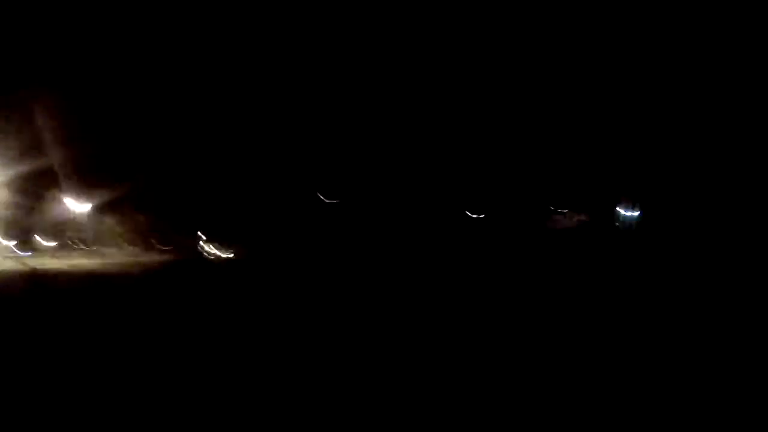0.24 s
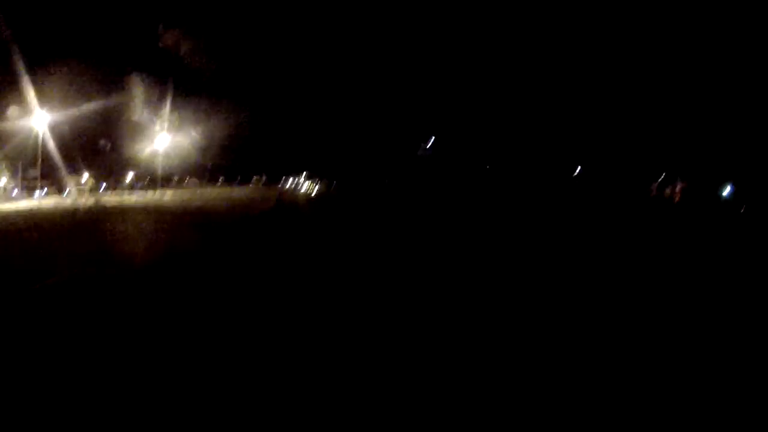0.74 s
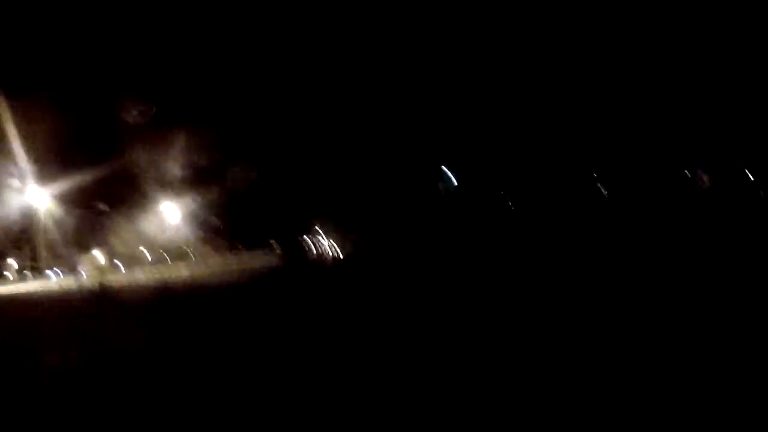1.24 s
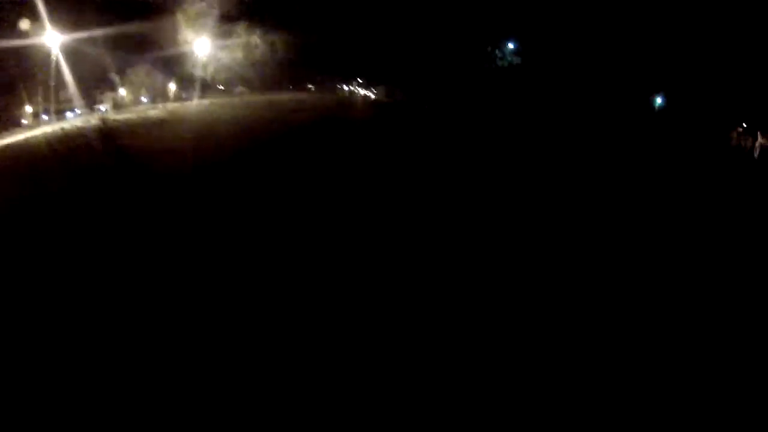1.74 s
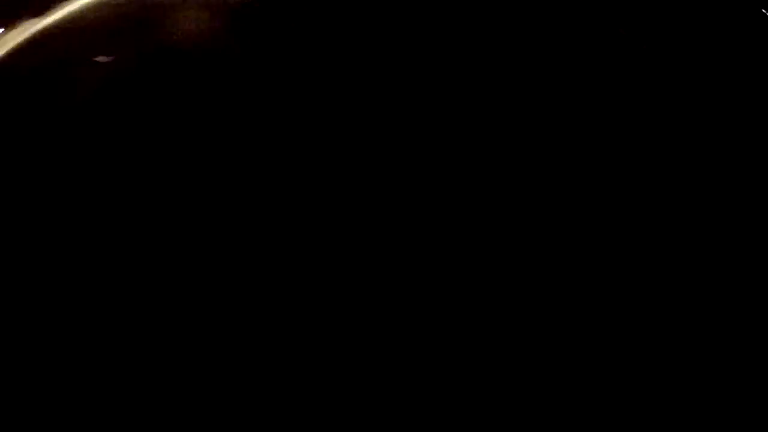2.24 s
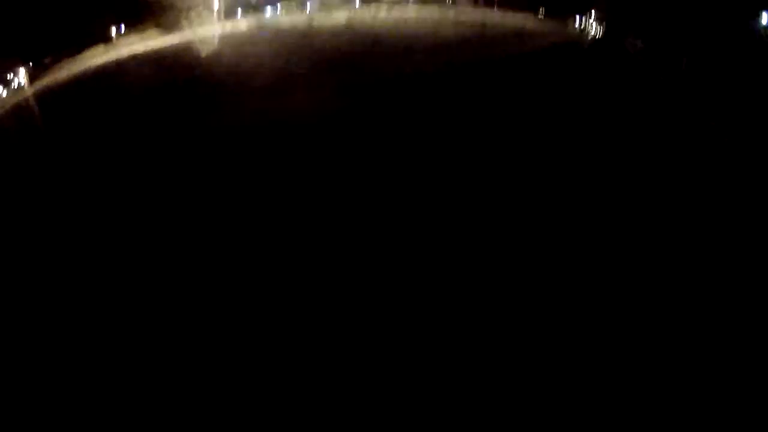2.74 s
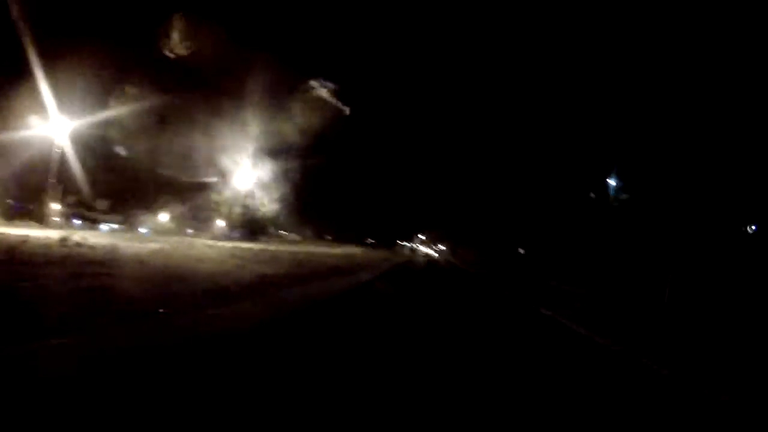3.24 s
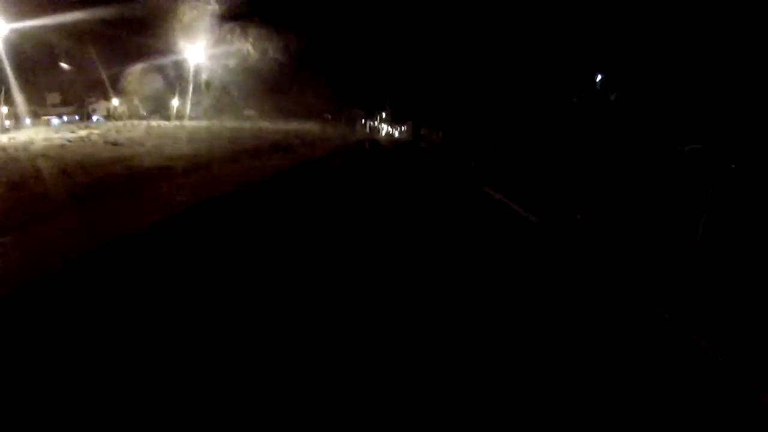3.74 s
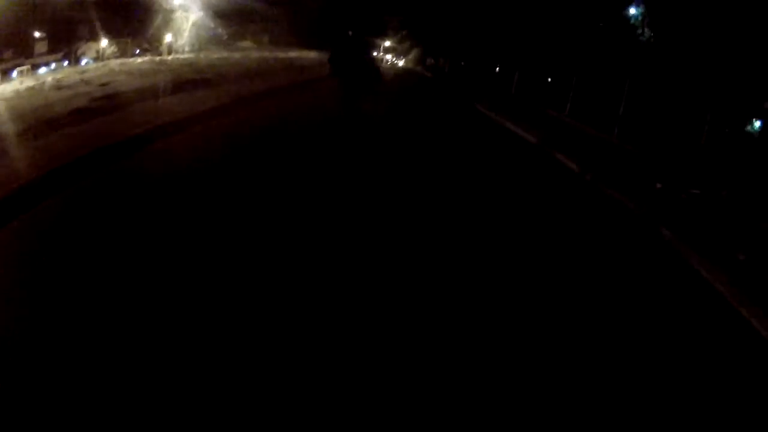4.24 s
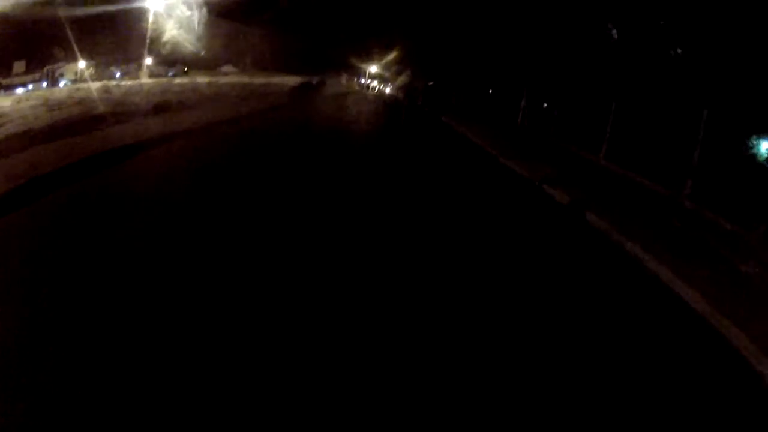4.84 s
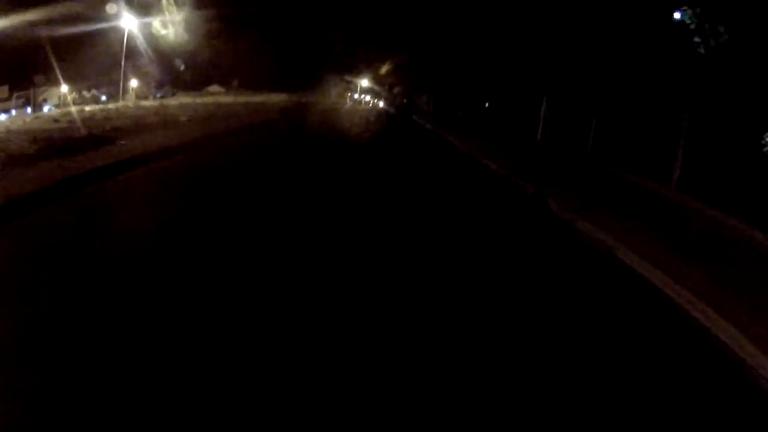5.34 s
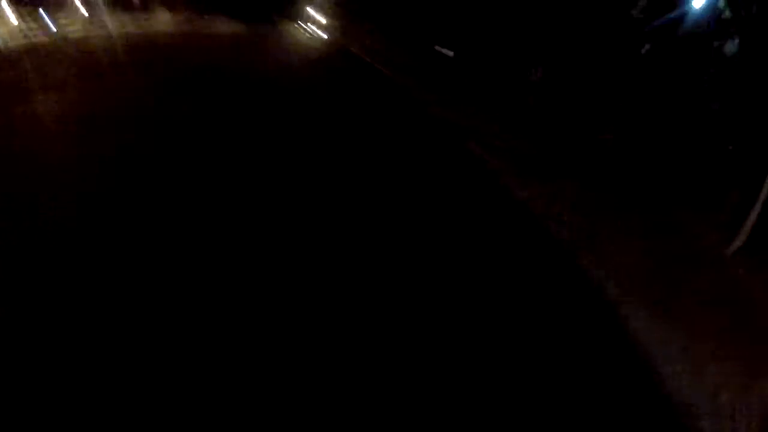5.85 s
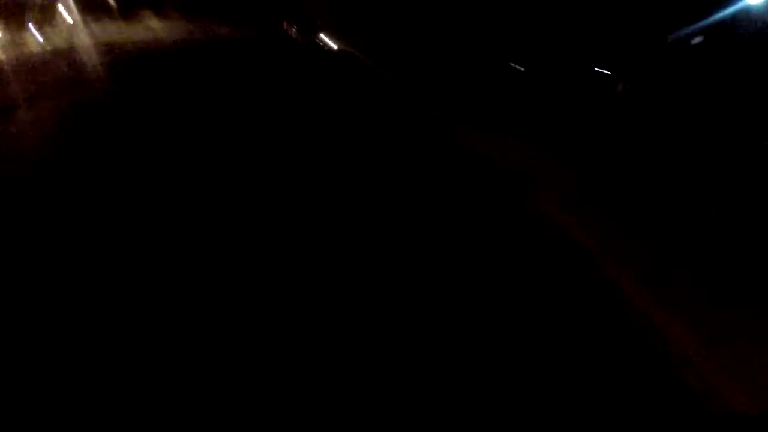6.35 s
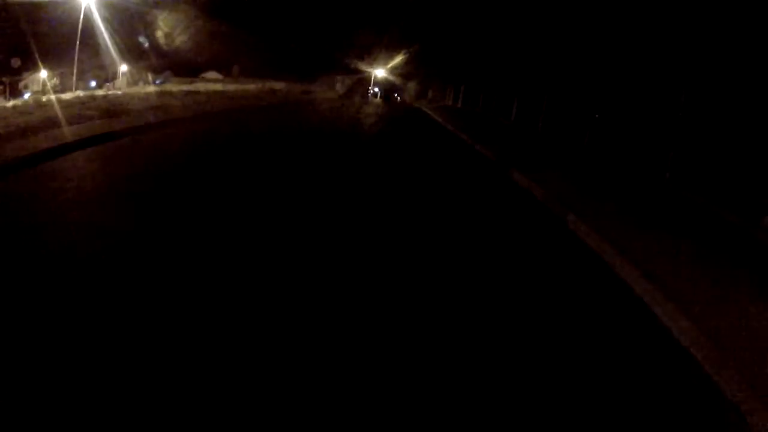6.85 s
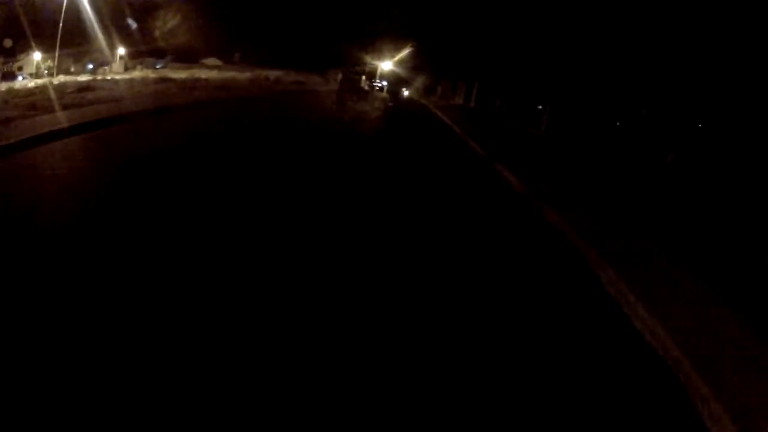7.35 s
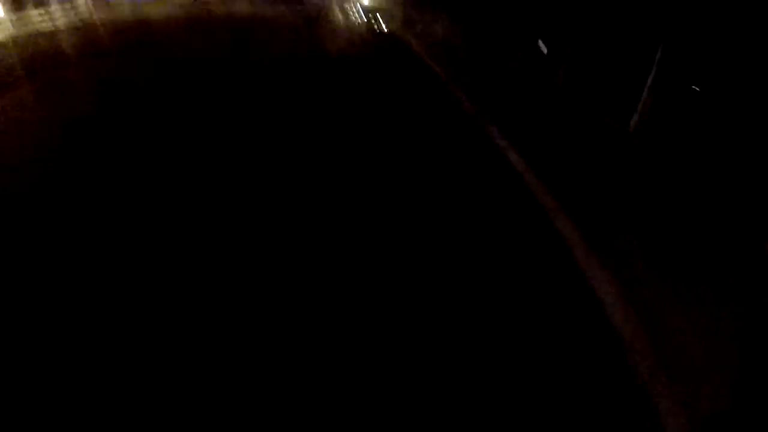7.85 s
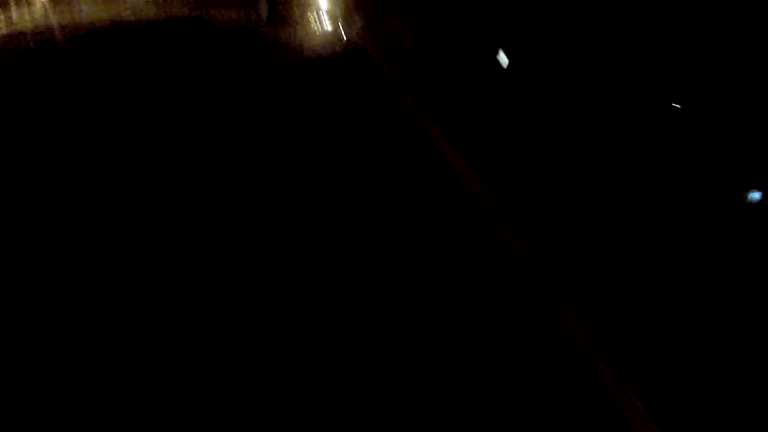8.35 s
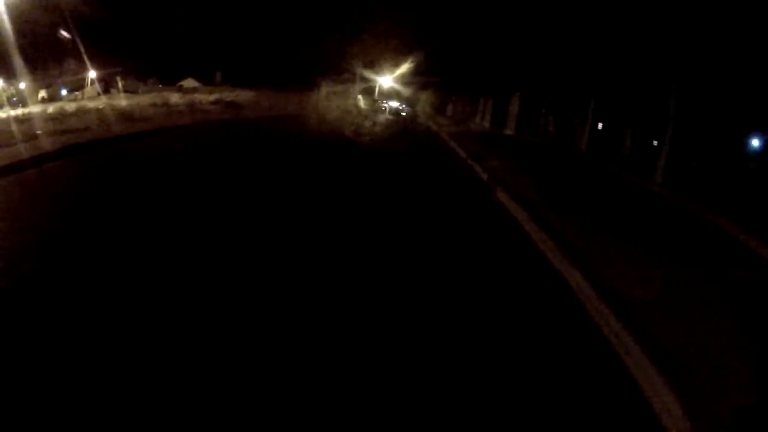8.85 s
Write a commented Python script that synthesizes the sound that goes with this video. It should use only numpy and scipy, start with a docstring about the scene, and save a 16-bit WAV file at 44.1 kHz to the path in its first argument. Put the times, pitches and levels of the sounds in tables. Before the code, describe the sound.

Close, boomy mono sound from a handheld camera outdoors: deep distorted knocks, plastic taps and skin rubs come first over quiet rolling wheels. After a brief low drone and a second bout of handling around three seconds, the longboard's grainy hum on asphalt takes over, swelling past the middle, with wind rumble, sparse dry ticks, sizzling wheels and two final finger taps.

```python
"""A longboard rolls down an asphalt street at night, heard from a small camera in the rider's hand.
From start to end the rough road drums a hum out of wheels and deck, and wind rumbles on the microphone.
For two seconds restless fingers tap, rub and knock the camera, with thumps so deep that they overload it.
A soft low drone swells up, then comes a second flurry with a short rub; small dry ticks are scattered about.
Later the hum grows, a fine wheel sizzle comes closer twice, and two last taps sound near the end."""
import sys
import numpy as np
from scipy import signal
from scipy.fft import rfft, irfft, next_fast_len
from scipy.io import wavfile

SR = 44100
rng = np.random.default_rng(int(sys.argv[2]) if len(sys.argv) > 2 else 0)


def generate_wav(sig):
    """Save sig (samples, or channels by samples) to the path in sys.argv[1] as 16-bit PCM at SR."""
    pcm = np.round(np.clip(np.atleast_2d(sig).T, -1, 1) * 32767).astype(np.int16)
    wavfile.write(sys.argv[1], SR, pcm)


N = 400869
TIME = np.arange(N) / SR

# spells when the fingers are restless: from/s, to/s
FIDGETS = [(0.05, 2.05), (2.95, 3.25)]
# jolts of the camera, levels relative: t/s, knock level/dB, hardness/dB, thud pitch f/Hz,
# rocking level/dB, rocking pitch f/Hz, time for the rocking to fall 60 dB/s
JOLTS = [(0.005, -4.5, 2, 330, -11, 65, .16), (0.099, -16.5, -10, 200, -18, 56, .13),
         (0.2752, 6, -6, 274, -1.5, 69.5, .089), (0.334, -4, -14, 215, 2, 89.6, .047),
         (0.388, -16, -3, 230, -11.5, 56, .083), (0.421, -13.5, -3, 221, -7.5, 88, .13),
         (0.615, -12, -14, 230, -17.5, 52.3, .21), (0.904, -26, -3, 200, -10.5, 65, .11),
         (1.0234, 2.5, -5, 299, -3.5, 64.6, .11), (1.073, -14.5, 6, 250, -1.5, 88, .087),
         (1.1224, 5.5, -1.5, 282, -5, 61, .11), (1.156, -16, 11, 300, -15, 82, .17),
         (1.3338, -2.5, -11, 222, -6.5, 48, .13), (1.612, -23, 1, 250, -14.5, 68, .13),
         (1.739, -9, -11, 230, -14, 78, .1), (1.812, -23, -5, 230, -14, 64, .18),
         (1.9009, 0.5, -7.5, 292, -2, 66.4, .13), (1.9725, -2, -1.5, 250, 0.5, 81.7, .081),
         (3.017, 2.5, 4, 350, -14, 60, .19), (3.133, -16, -8, 220, -19, 56.5, .15),
         (3.217, -20.5, -16, 230, -36, 60, .1), (3.364, -28, -10, 220, -21, 53.8, .17),
         (3.466, -20.5, -1, 200, -20.5, 101, .069), (3.728, -25, 0, 237, -16, 55.4, .19),
         (8.02, -32, 0, 200, -35, 89, .11)]


def from_db(db):
    """Turn decibels into a gain."""
    return 10 ** (np.asarray(db) / 20)


def rms_one(x):
    """Scale a sound to an average (rms) strength of 1."""
    return x / np.sqrt(np.mean(x ** 2) + 1e-20)


def in_time(rows):
    """Draw straight lines between the points of each column, one value per sample."""
    s, *columns = np.transpose(rows)
    return [np.interp(TIME, s, column) for column in columns]


def drift(rate):
    """Wander at random with a spread of 1, taking `rate` new values per second."""
    knots = rng.standard_normal(2000)
    return rms_one(np.interp(TIME * rate, np.arange(len(knots)), knots))


def swell(start_s, length_s, attack_s, release_s):
    """Gain that rises, may hold at 1, and falls."""
    rise = (TIME - start_s) / attack_s
    fall = (start_s + length_s - TIME) / release_s
    return np.clip(np.minimum(rise, fall), 0, 1)


def coloured(x, spectrum):
    """Give a steady sound a balance of low and high, at rms 1."""
    hz, level_db = np.transpose(spectrum)
    size = next_fast_len(N)
    bins = np.maximum(np.fft.rfftfreq(size, 1 / SR), 1)
    top_fade = 1 + (bins / hz[-1] / 2) ** 4
    gain = from_db(np.interp(np.log(bins), np.log(hz), level_db)) / top_fade
    return rms_one(irfft(rfft(x, size) * gain, size)[:N])


def resonate(x, modes, order=2):
    """Ring resonances side by side; order 2 has steep skirts, order 1 alternates signs to fill the valleys."""
    out = 0
    for k, (hz, width_hz, level_db) in enumerate(modes):
        r = np.exp(-np.pi * width_hz / SR)
        top = (1 - r * r) / 2
        section = [top, 0, -top, 1, -2 * r * np.cos(2 * np.pi * hz / SR), r * r]
        sign = (-1) ** (k * order)
        out = out + sign * from_db(level_db) * signal.sosfilt([section] * order, x + 1e-18)
    return out


def add(track, s, sound):
    """Mix a sound into a track at a time in seconds."""
    start = max(int(s * SR), 0)
    track[start:start + len(sound)] += sound[:N - start]


def blow(modes, edge_hz, contact_s, scuff, scuff_t60):
    """A short push and a scuff that swells and dies make an object ring; its total energy is fixed."""
    t = TIME[:SR // 10]
    push = t * np.exp(-t / max(contact_s, 1 / SR))   # a longer contact is duller
    scuff_shape = (1 - np.exp(-t / .001)) * from_db(-60 * t / max(scuff_t60, .003))
    force = push / push.sum() + scuff * scuff_shape * rng.standard_normal(len(t))
    # no two blows excite the resonances quite alike
    struck = [(hz, width, db + 1.6 * rng.standard_normal()) for hz, width, db in modes]
    damping = signal.butter(10, min(edge_hz, SR / 3), fs=SR, output="sos")
    sound = signal.sosfilt(damping, resonate(force, struck, order=1))
    return sound / np.sqrt(np.sum(sound ** 2) / (.004 * SR))   # as much energy as 4 ms at level 1


def wind():
    """Lumpy eddies rumble at the microphone port; a moving hand stirs the air, which then settles."""
    # air flow, even until the first point: t/s, relative level/dB
    flow = [(4.0, -47.5), (4.15, -52.5), (5.45, -48.5), (5.75, -53.0), (6.04, -46.5), (6.33, -50.0),
            (7.34, -44.5), (7.49, -50.0), (7.78, -46.0), (9.09, -47.5)]
    # colour of the rumble: f/Hz, level per Hz/dB
    buffet = [(15, -12), (30, -0.5), (52, 4.5), (80, -0.5), (110, -11.5), (160, -16), (400, -21.5)]
    gain_db, stir_db, stir_attack_s, stir_settle_s = 1.0, 11, .05, 1.6
    flow_db, = in_time(flow)
    stir = sum(swell(start, end - start, stir_attack_s, stir_settle_s) for start, end in FIDGETS)
    eddies_db = 1.2 * drift(rate=9)
    level_db = gain_db + flow_db + stir_db * stir + eddies_db
    return coloured(rng.standard_normal(N), buffet) * from_db(level_db)


def drone():
    """Noise through one narrow resonance makes a wavering bass drone that swells for a moment."""
    # the resonance: f/Hz, width/Hz, level/dB
    ring = [(83.7, 21, 0)]
    start_s, length_s, fade_s, level_db = 2.05, 0.98, .1, -43.5
    gain = from_db(level_db) * swell(start_s, length_s, fade_s, fade_s)
    return rms_one(resonate(rng.standard_normal(N), ring)) * gain


def road_grain(per_s, spread_db):
    """Stones of uneven size pass under the wheels, each giving one tiny push."""
    sizes = from_db(spread_db * np.minimum(rng.exponential(1, N), 4)) * rng.standard_normal(N)
    return sizes * (rng.random(N) < per_s / SR)


def wheels():
    """The asphalt drums the deck's resonances and makes the wheels hiss and sizzle where they touch."""
    # rougher and smoother asphalt: t/s, relative hum level/dB, relative hiss level/dB
    ride = [(0.0, -50.0, -57.0), (0.3, -49.0, -60.0), (0.89, -48.0, -60.5), (1.19, -51.0, -58.5),
            (1.79, -50.0, -60.0), (2.53, -44.0, -59.0), (2.68, -48.5, -60.5), (3.58, -48.0, -56.0),
            (4.62, -44.5, -61.5), (5.66, -45.0, -60.0), (5.81, -43.5, -57.5), (6.11, -41.0, -58.0),
            (6.71, -41.5, -56.0), (7.0, -44.0, -56.5), (7.3, -46.5, -60.5), (7.75, -44.0, -58.0),
            (8.2, -45.0, -60.0), (9.09, -48.0, -58.5)]
    # wheel and deck resonances: f/Hz, width/Hz, level/dB
    deck = [(245, 93, -3), (340.4, 28.6, 3.5), (453, 79.4, 6), (511, 85, -4), (658, 47, -6.5),
            (954, 73, -11.5)]
    # colour of the hiss where the wheels touch the road: f/Hz, level per Hz/dB
    hiss_colour = [(100, 3), (600, 7.5), (820, -2), (1030, 0.5), (1330, -1), (1520, -6), (1900, 2.5),
                   (2300, -3.5), (2650, -4.5), (2950, -10.5), (3500, -9), (4200, -21), (7500, -31),
                   (9000, -20)]
    # resonances of the wheels' fine sizzle: f/Hz, width/Hz, level/dB
    sizzle_ring = [(5210, 870, -6), (6700, 980, -7)]
    # the camera tilts down towards the wheels, whose sizzle comes closer: start t/s, length/s
    tilts = [(5.7, 0.95), (7.8, 0.72)]
    hum_gain_db, hiss_gain_db = 0.1, 10.0
    sizzle_base_db, sizzle_follows = -74, .4   # level at the mean hum; dB per dB of hum
    tilt_turn_s, tilt_sizzle_db = .33, 5.5

    hum_db, hiss_db = in_time(ride)
    tilt = sum(swell(s, length_s, tilt_turn_s, tilt_turn_s) for s, length_s in tilts)
    sizzle_db = sizzle_base_db + sizzle_follows * (hum_db - hum_db.mean()) + tilt_sizzle_db * tilt
    patches_db = .6 * drift(rate=14)   # coarser and smoother stretches of road
    hum = rms_one(resonate(road_grain(per_s=3300, spread_db=3), deck)) * from_db(hum_db + hum_gain_db)
    hiss = coloured(road_grain(per_s=9000, spread_db=2.0), hiss_colour) * from_db(hiss_db + hiss_gain_db)
    sizzle = rms_one(resonate(rng.standard_normal(N), sizzle_ring)) * from_db(sizzle_db)
    return hum * from_db(patches_db) + (hiss + sizzle) * from_db(patches_db / 2)


def ticks():
    """Tiny bright crackles ring high resonances, each gone within a few hundredths of a second."""
    # dry ticks: t/s, relative level/dB
    crackles = [(0.3114, -41), (0.3402, -31), (0.429, -39), (0.4559, -40.5), (0.5927, -42.5), (1.052, -38),
                (1.0862, -34.5), (1.1106, -32), (1.1772, -43), (1.2437, -42), (1.3029, -44), (1.6227, -42),
                (1.6443, -35), (1.748, -42), (1.907, -30), (1.9662, -28), (2.0657, -38.5), (2.2763, -40),
                (2.8684, -40.5), (3.7439, -41), (4.4224, -38.5), (5.2223, -37.5), (6.0013, -38)]
    # resonances of the ticks: f/Hz, width/Hz, level/dB
    ring = [(1100, 480, 3), (2550, 470, 6), (3670, 180, 4.5), (5100, 360, -2), (6660, 440, -7),
            (8800, 2000, -8)]
    gain_db, edge_hz = 0.5, 11000
    out = np.zeros(N)
    for s, level_db in crackles:
        crackle = blow(ring, edge_hz, contact_s=0.00015, scuff=0.54, scuff_t60=.018)
        add(out, s, from_db(level_db + gain_db) * crackle)
    return out


def rub():
    """Skin catches and slips as a finger slides over the case; each stroke swells and fades."""
    # strokes: start t/s, length/s, level/dB
    strokes = [(-0.2, 0.65, -49.5), (0.55, 0.55, -50.5), (1.2, 0.65, -49), (2.95, 0.95, -48.5),
               (3.24, 0.33, -38)]
    # colour of skin rubbing on the case: f/Hz, level per Hz/dB
    skin = [(200, 6), (800, -21.5), (1350, -3.5), (1600, -3), (2000, 1), (2350, 1.5), (2900, -19),
            (3600, -11), (4200, -28)]
    attack_s, release_s = .27, .36
    pressure = sum(from_db(db) * swell(s, length_s, attack_s, release_s) for s, length_s, db in strokes)
    catch_and_slip = from_db(1.65 * drift(rate=120))
    return coloured(rng.standard_normal(N), skin) * pressure * catch_and_slip


def tap(level_db, bass_db, scuff_t60):
    """A finger rings the thin case; the pad gives more bass than the nail."""
    # case resonances under a fingertip, before the bass is set: f/Hz, width/Hz, level/dB
    case = [(125, 260, 8.5), (580, 116, -23), (952, 87, 2), (1390, 79, -19), (1794, 550, 9.5),
            (2070, 700, 9.5)]
    gain_db, edge_hz = -6.5, 2260
    modes = [(hz, width, db + bass_db * (hz < 1500)) for hz, width, db in case]
    sound = blow(modes, edge_hz, contact_s=.00004, scuff=0.089, scuff_t60=scuff_t60)
    return from_db(level_db + gain_db) * sound


def knock(level_db, hardness_db, thud_hz):
    """A thud through the whole body, pitched by the grip; a hard contact reaches the upper modes."""
    # body resonances under a knock, before hardness is added: f/Hz, width/Hz, level/dB
    body = [(515, 94, -8), (745, 50, -9.5), (1017, 85, -12), (1370, 220, -18.5), (1880, 260, -16.5),
            (2510, 660, -24.5), (3630, 560, -25)]
    gain_db, edge_hz = -7, 3800
    thud = [(thud_hz / 2, 120, -2), (thud_hz, 130, 0)]
    modes = thud + [(hz, width, db + hardness_db) for hz, width, db in body]
    sound = blow(modes, edge_hz, contact_s=0.00019, scuff=0.054, scuff_t60=0.033)
    return from_db(level_db + gain_db) * sound


def disperse(x, hz, width_hz):
    """Bending waves travel at unequal speeds, which spreads each attack over about a millisecond."""
    r = np.exp(-np.pi * width_hz / SR)
    poles = [1, -2 * r * np.cos(2 * np.pi * hz / SR), r * r]
    return signal.lfilter(poles[::-1], poles, x + 1e-18)   # all-pass: shifts time, keeps levels


def handling():
    """Taps and light brushes ring the thin case; a jolt is a scuff, then a knock on body and case together."""
    # finger taps on the case: t/s, relative level/dB, bass level/dB
    finger_taps = [(0.0155, -20, 12), (0.227, -28, 4), (0.246, -22.5, 4), (0.333, -16, 9), (0.348, -17, 17),
                   (0.590, -17.5, 4), (0.759, -12, 1.5), (0.839, -26.5, 11), (0.898, -16.5, -2),
                   (1.1047, -10.5, 1), (1.1894, -18.5, 4), (1.3474, -21.5, 8), (1.596, -18.5, 2),
                   (1.6457, -21, 13), (1.6615, -24, 12), (1.7538, -16.5, 11), (1.811, -16.5, 4),
                   (1.945, -20, 3), (2.963, -26, 17), (2.99, -9, -1), (3.35, -16.5, 12), (3.4339, -19.5, 4),
                   (3.7125, -22, 11), (8.021, -13, -2), (8.5167, -7.5, -7)]
    tap_t60_s, octaves_per_bass_db = .017, .065   # a flatter finger, with more bass, scuffs longer
    # the finger scuffs just before it knocks
    grab_lead_s, grab_db, grab_follows, grab_bass_db, grab_t60_s = .0095, -19, .75, 10, .04
    # every knock also rings the case
    case_under_knock_db, case_per_hard_db, case_lag_s, case_bass_db = -10, .35, .002, 2.5
    # restless fingers brush the case at random
    brushes_per_s, brush_db, brush_spread_db, brush_bass_db, brush_t60_s = 7, -35, 2, 5, .04

    out = np.zeros(N)
    for s, level_db, bass_db in finger_taps:
        add(out, s, tap(level_db, bass_db, tap_t60_s * 2 ** (octaves_per_bass_db * bass_db)))
    for s, level_db, hardness_db, thud_hz, *_ in JOLTS:
        case_db = level_db + case_under_knock_db + case_per_hard_db * hardness_db
        add(out, s - grab_lead_s, tap(grab_db + grab_follows * level_db, grab_bass_db, grab_t60_s))
        add(out, s, knock(level_db, hardness_db, thud_hz))
        add(out, s + case_lag_s, tap(case_db, case_bass_db, scuff_t60=.022))
    for start, end in FIDGETS:
        for s in rng.uniform(start, end, int(brushes_per_s * (end - start))):
            level_db = brush_db + brush_spread_db * rng.standard_normal()
            add(out, s, tap(level_db, brush_bass_db, brush_t60_s))
    return disperse(out, hz=1900, width_hz=1340)


def thumps(rise_s=0.0015, low_cut_hz=32):
    """Each jolt sets the camera rocking for a few slow cycles; the microphone loses the deepest part."""
    gain_db = 7.5
    base_lag_s, lag_s_per_db = .0038, .0003   # rocking follows the knock, later after a soft one
    out, t = np.zeros(N), TIME[:SR // 2]
    for s, knock_db, _, _, rocking_db, hz, t60 in JOLTS:
        swing = (1 - np.exp(-t / rise_s)) * from_db(-60 * t / t60)
        lag_s = base_lag_s - lag_s_per_db * knock_db
        add(out, s + lag_s, -from_db(rocking_db + gain_db) * swing * np.sin(2 * np.pi * hz * t))
    return signal.sosfilt(signal.butter(1, low_cut_hz, "high", fs=SR, output="sos"), out)


def scene():
    """One microphone feeds both channels."""
    mono = wind() + drone() + wheels() + ticks() + rub() + handling() + thumps()
    return np.array([mono, mono])


def record(dry, mirror_db=1.0):
    """A coarse sample-and-hold mirrors the sound around its rate; peaks clip and the top is cut."""
    hold_hz, cutoff_hz = 12000, 15400
    # the faster the sound changes, the stronger its mirror image
    slope = np.gradient(dry, axis=1) * SR / (2 * np.pi * hold_hz)
    slope = signal.sosfilt(signal.butter(6, 4200, fs=SR, output="sos"), slope)
    mirror = from_db(mirror_db) * slope * 2 * np.sin(2 * np.pi * hold_hz * TIME)
    clipped = np.clip(dry + mirror, -1, 1)
    return signal.sosfilt(signal.ellip(10, .1, 80, cutoff_hz, fs=SR, output="sos"), clipped)


dry = scene()
out = record(dry)
generate_wav(out)
```